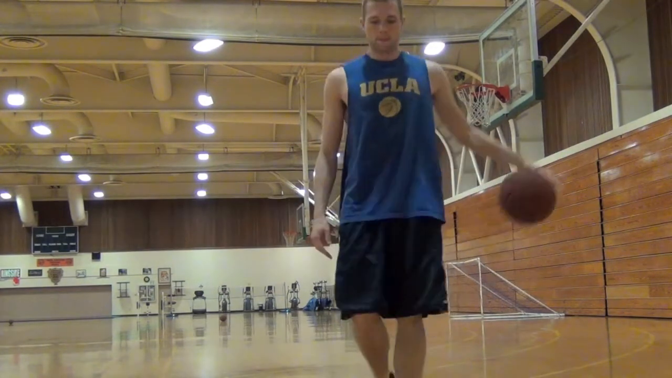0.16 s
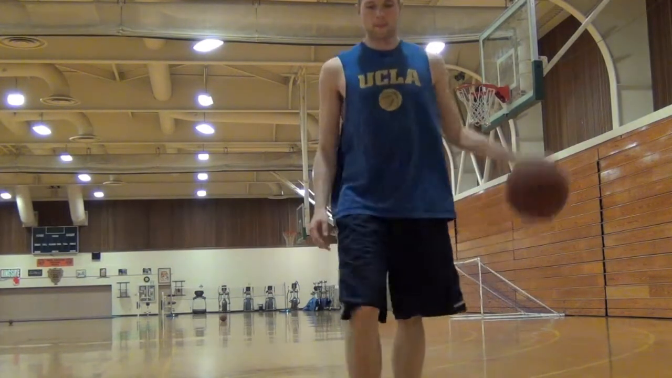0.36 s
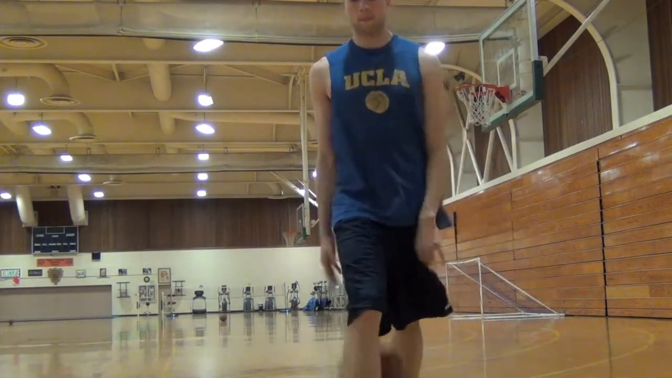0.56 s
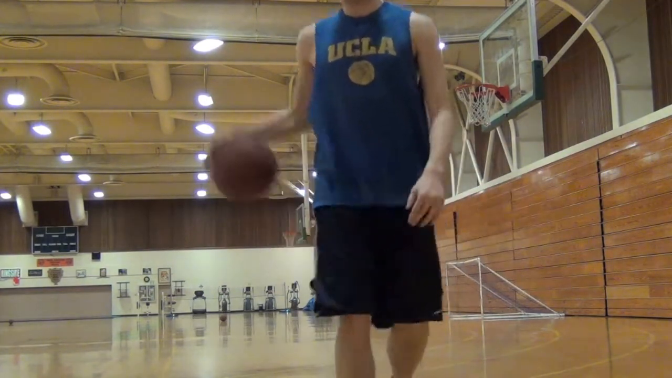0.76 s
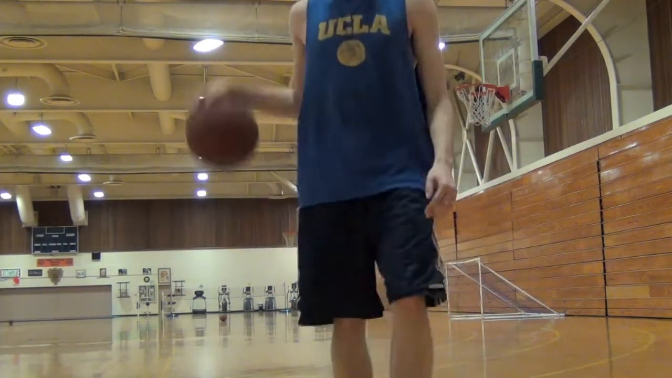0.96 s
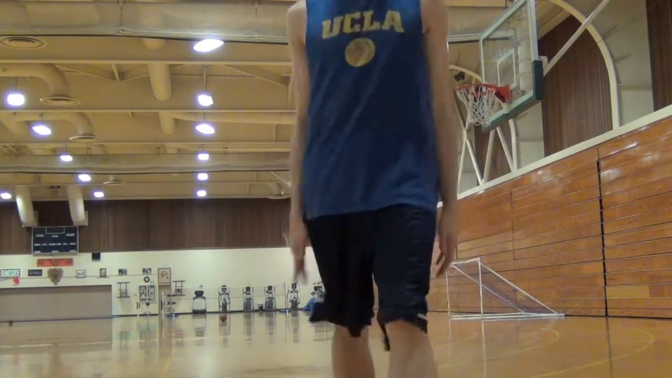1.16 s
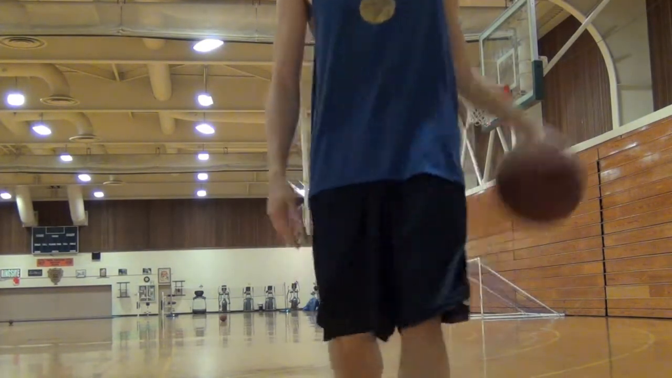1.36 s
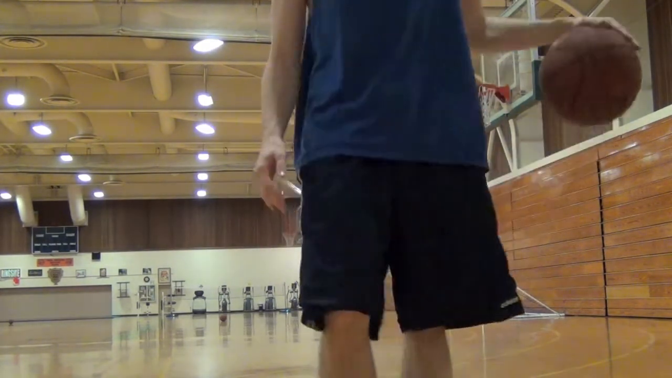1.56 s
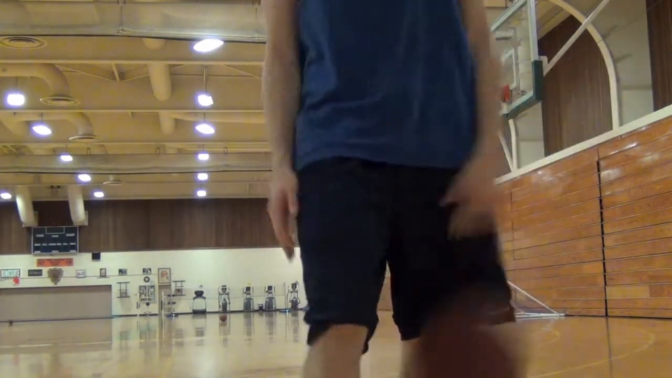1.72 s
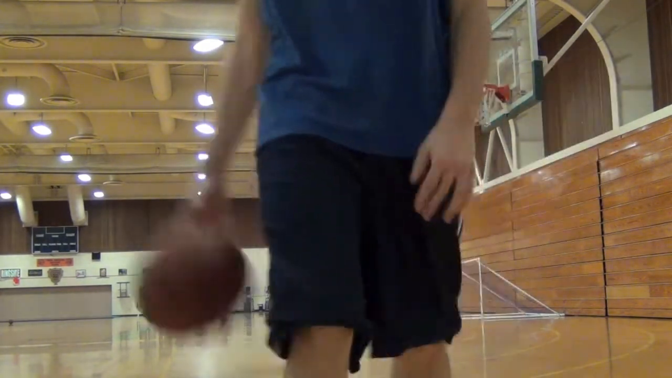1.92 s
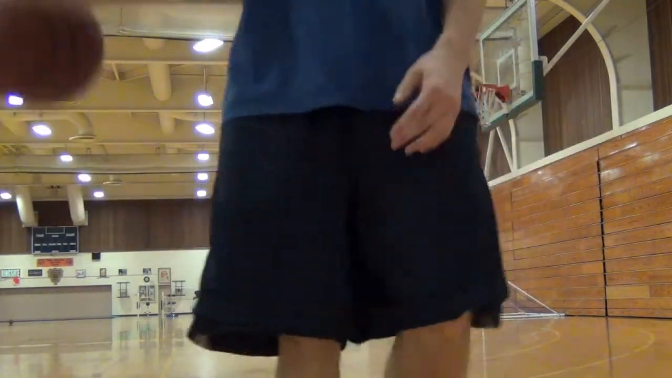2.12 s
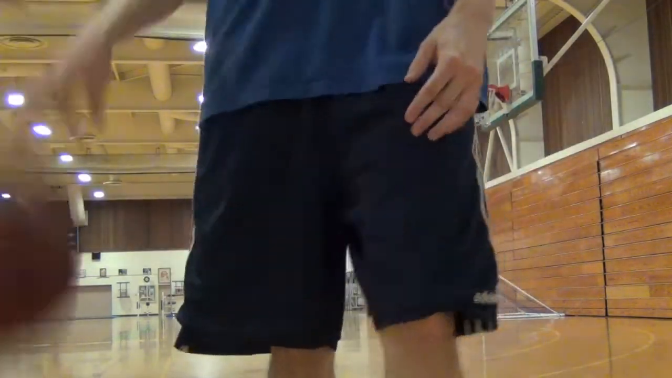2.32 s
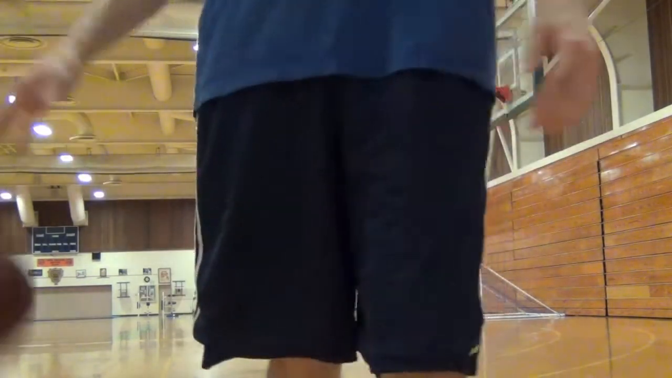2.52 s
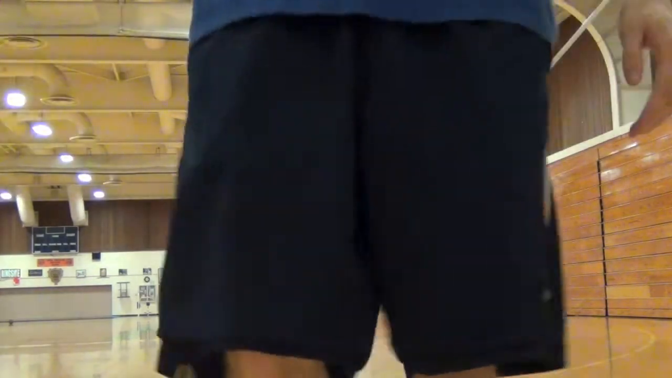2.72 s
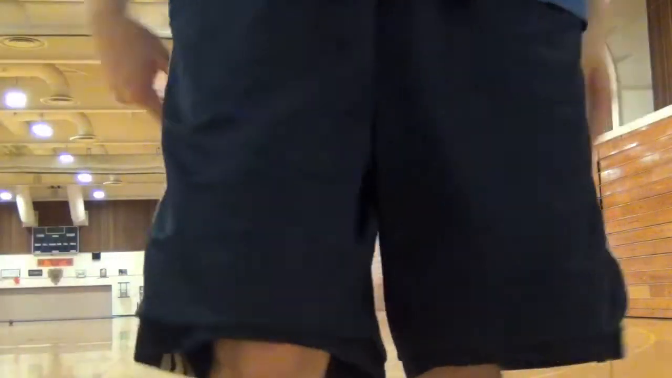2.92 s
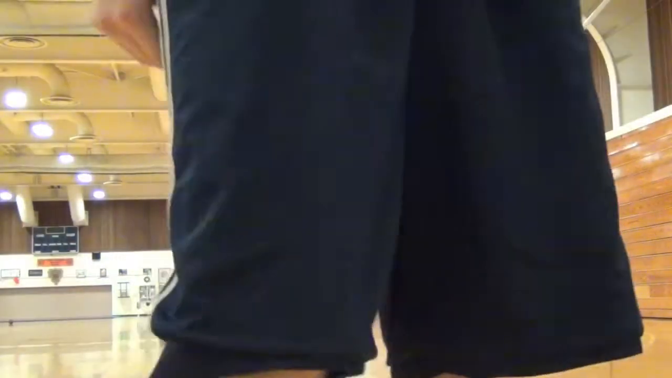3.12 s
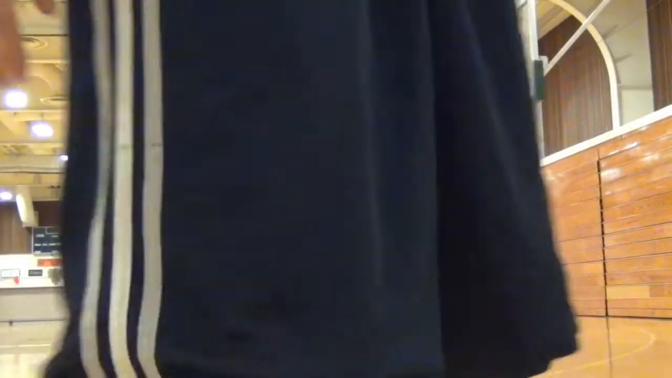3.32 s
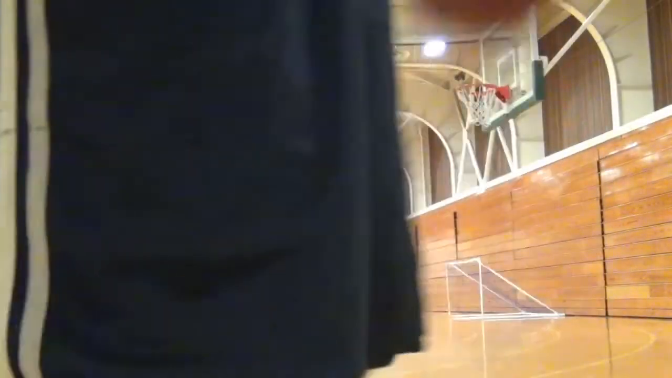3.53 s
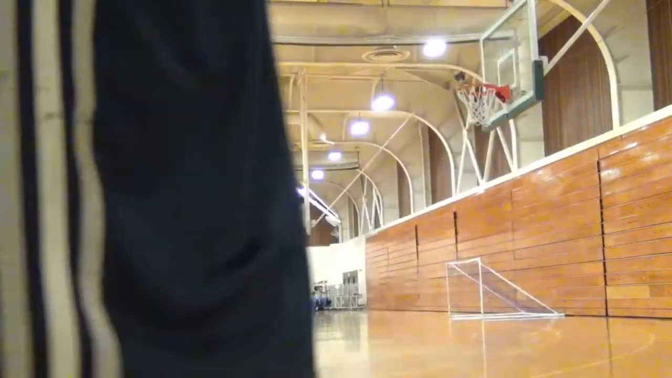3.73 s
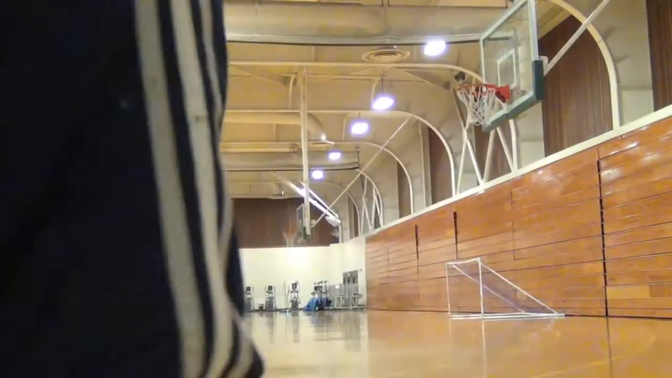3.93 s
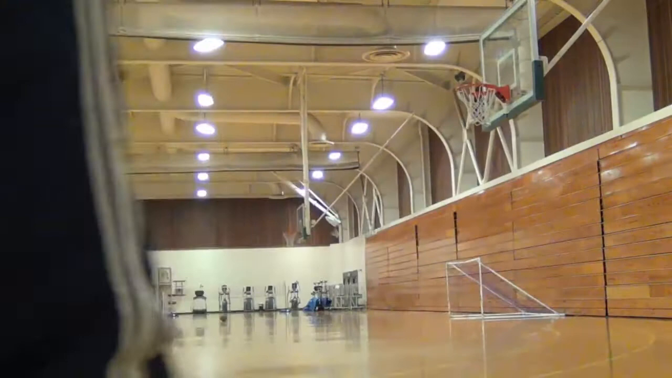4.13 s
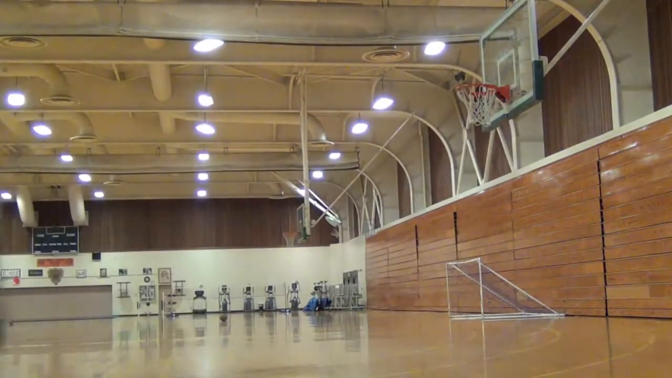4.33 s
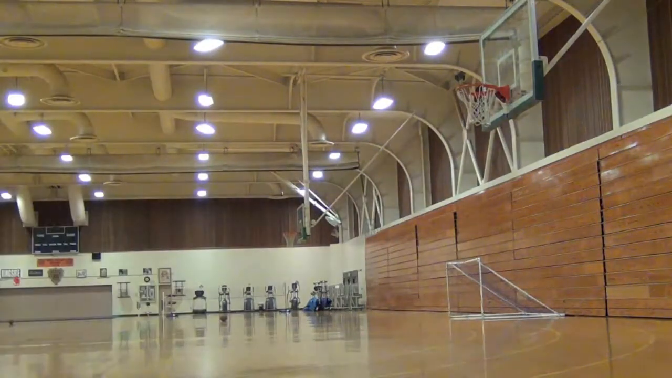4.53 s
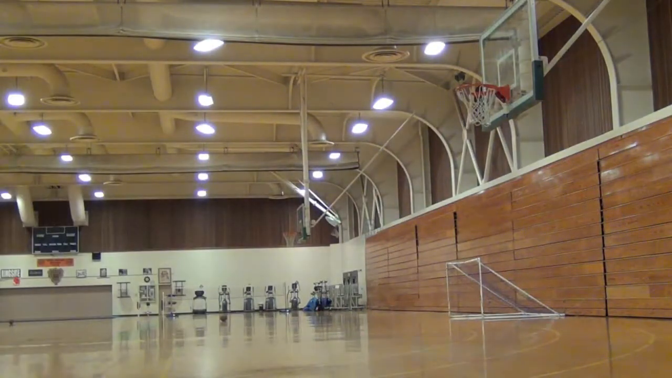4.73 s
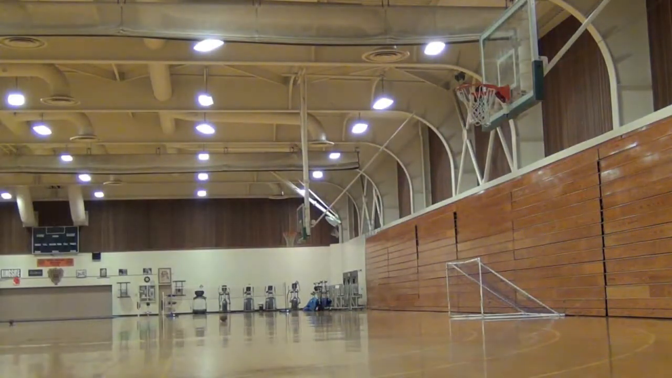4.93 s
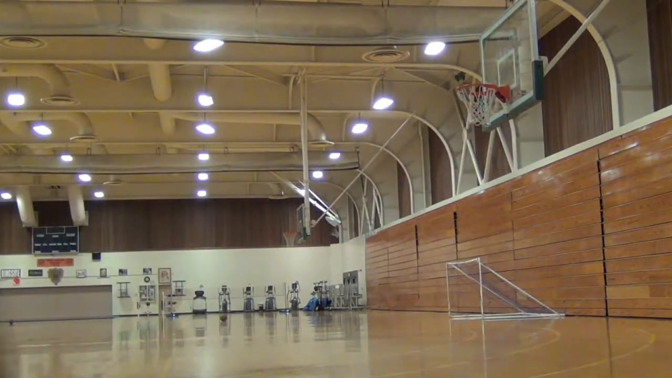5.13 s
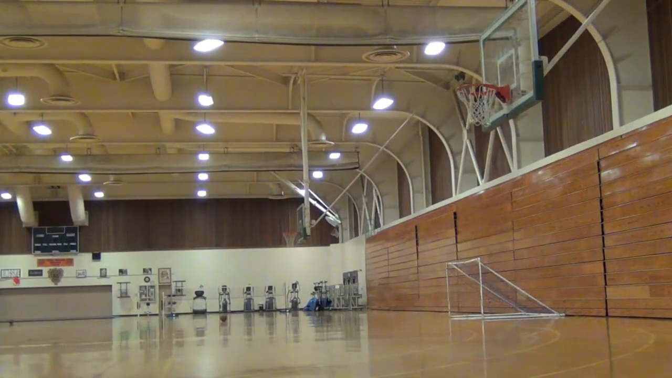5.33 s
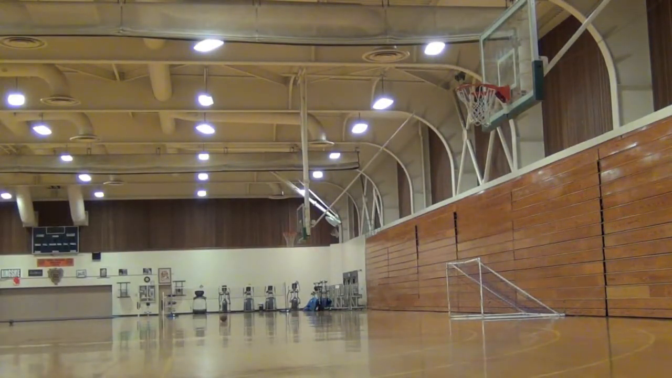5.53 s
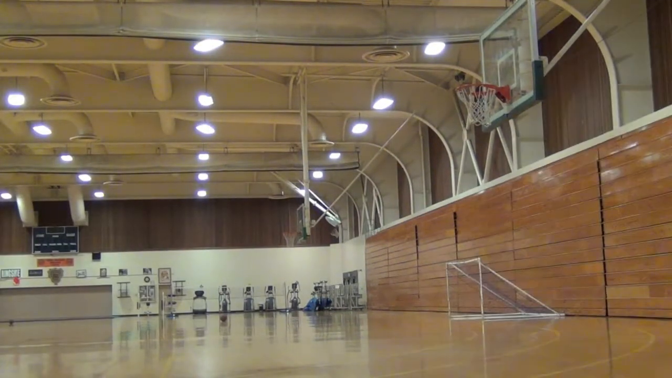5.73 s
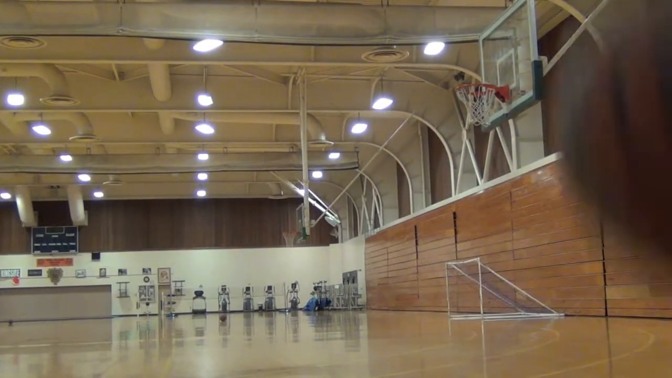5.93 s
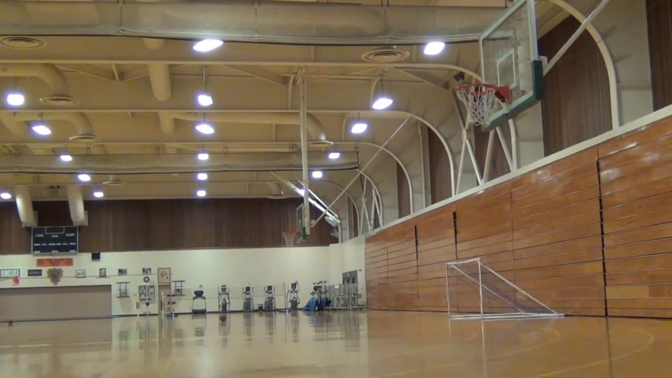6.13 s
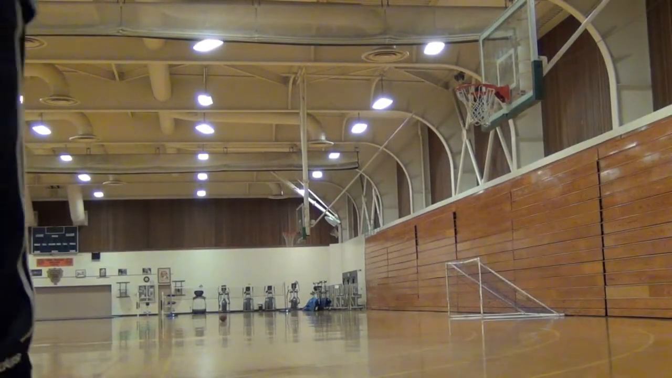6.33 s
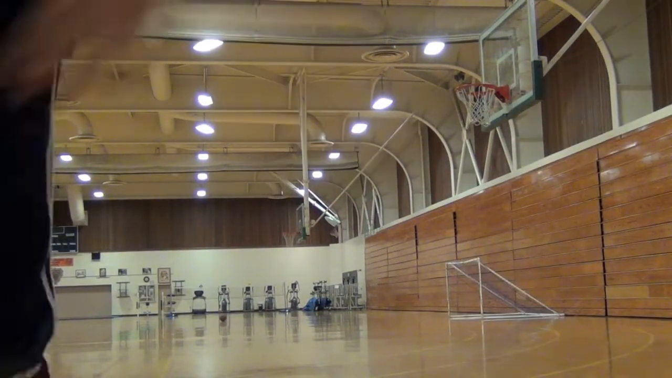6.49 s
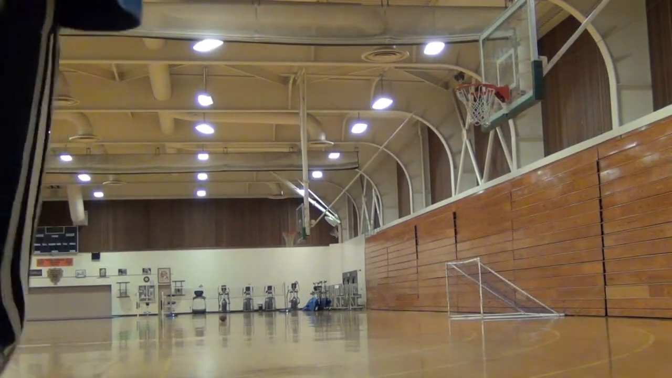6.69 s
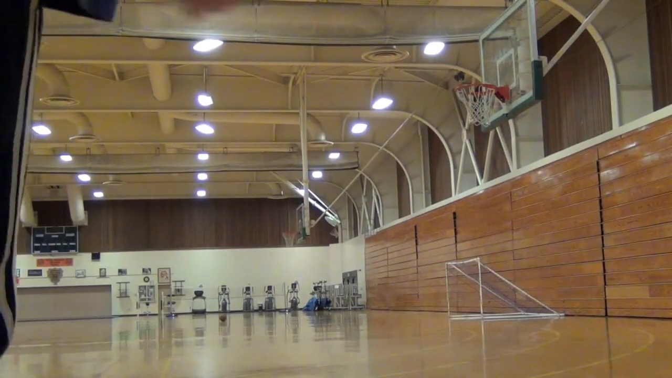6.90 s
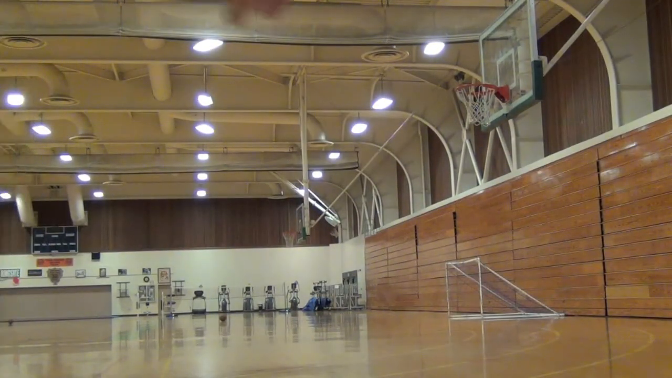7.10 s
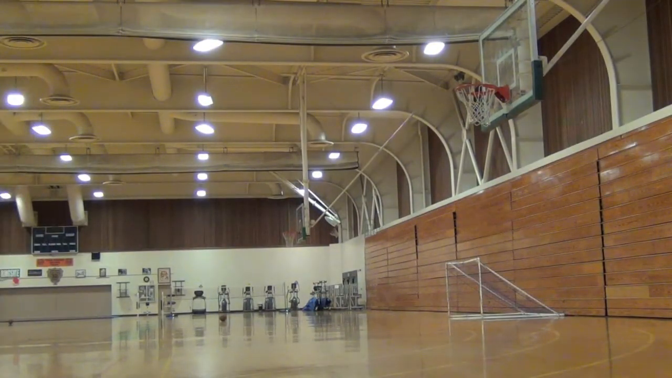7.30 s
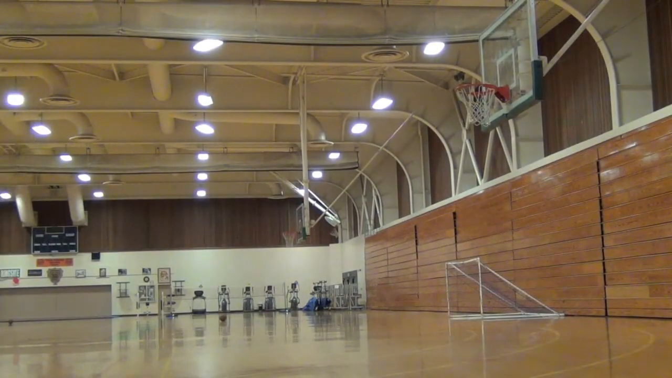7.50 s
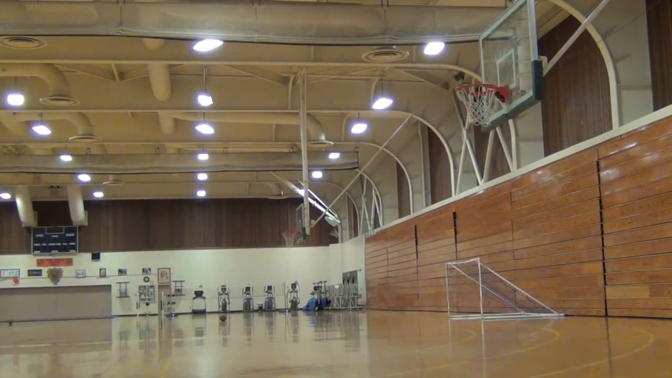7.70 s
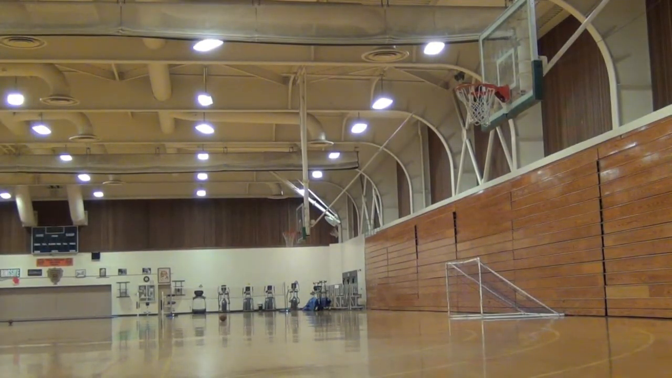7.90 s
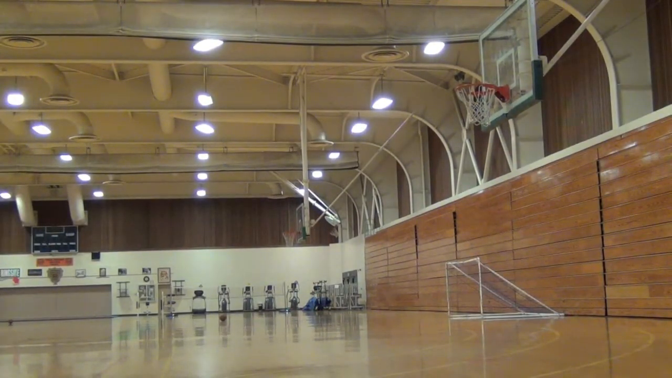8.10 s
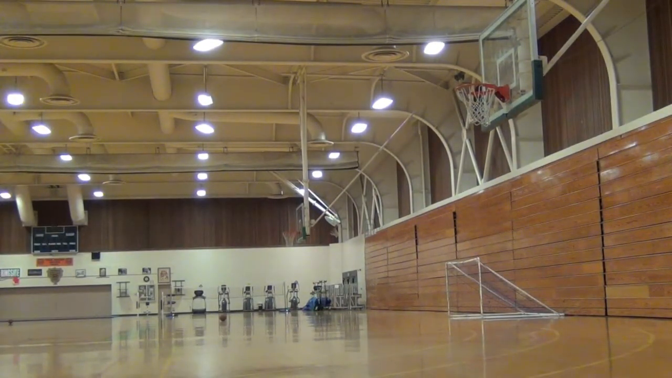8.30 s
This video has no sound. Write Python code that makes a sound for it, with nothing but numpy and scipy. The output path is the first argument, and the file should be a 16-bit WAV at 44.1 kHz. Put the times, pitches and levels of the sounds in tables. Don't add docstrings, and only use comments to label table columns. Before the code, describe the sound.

Steady, widely spaced basketball bounces crack and boom on hardwood in a large empty hall, with finger ticks and footsteps between them.

```python
import sys
import numpy as np
from scipy import signal
from scipy.fft import rfft, irfft
from scipy.io import wavfile
from scipy.ndimage import uniform_filter1d

SR = 44100
rng = np.random.default_rng(int(sys.argv[2]) if len(sys.argv) > 2 else 0)


def level_to_linear(level):
    exponent = np.asarray(level, float) / 20
    return 10 ** exponent


def store_wav(level_fs):
    pcm = np.round(np.clip(np.atleast_2d(level_fs), -1, 1) * 32767)
    wavfile.write(sys.argv[1], SR, pcm.T.astype(np.int16))


N = 368230
CONTACT_S = 11.3 / 1000
RISE_S = .00055

# f/Hz, side minus mid level/dB
SIDE_COLOUR = [(60, -36), (110, -62), (200, -34), (380, -19.5), (700, -12), (1290, -11), (2380, -10.5),
               (4400, -10.5), (8120, -11), (15000, -29)]


def on_log_hz(hz, table, col=1):
    table = np.array(table, float)
    return np.interp(np.log(hz + 1), np.log(table[:, 0]), table[:, col])


def colour(x, table):
    hz = np.fft.rfftfreq(x.shape[-1], 1 / SR)
    return irfft(rfft(x) * level_to_linear(on_log_hz(hz, table)), x.shape[-1])


def band(x, hz, octaves):
    edges = np.clip(hz * 2. ** np.array([-octaves / 2, octaves / 2]), 20, .45 * SR)
    return signal.sosfilt(signal.butter(2, edges, "bandpass", fs=SR, output="sos"), x)


def unit(x):
    return x / np.abs(x).max()


def add(out, s, x):
    i = int(round(s * SR))
    start = max(i, 0)
    end = max(start, min(i + x.shape[-1], N))
    out[:, start:end] += x[..., start - i:end - i]


def ring(hz, t60, size=8192):
    t = np.arange(size) / SR
    return np.sin(2 * np.pi * hz * t) * 1000. ** (-t / t60)


def burst(ms, size=2048):
    return rng.standard_normal(size) * np.exp(-np.arange(size) / SR / (max(ms, .1) / 1000))


def bounces():
    # slap t/s, hall level/dB, lift-off level/dB, long air ring level/dB
    hits = [(-0.39, -18.5, -20, -50), (0.5995, -23.5, -27, -50), (1.2379, -24, -26, -44),
            (1.8752, -24.5, -17, -53), (2.4964, -22, -9.5, -26), (3.0165, -22, -9, -41),
            (3.7569, -22.5, -14, -33), (4.4562, -19, -7.5, -43), (5.1222, -19, -11.5, -28),
            (5.8562, -22.5, -11.5, -39), (6.6356, -21, -8, -42), (7.3043, -20, -1, -31)]
    # boards f/Hz, brightness/dB, left gain/dB with right its opposite (below zero: the body
    spots = [(160, 18, 1, 0.26, 10.5), (173, 5.5, 0, 0.35, -1), (214, 6, 0.9, -0.06, -1),
             (194, 4, 0.4, 0.04, -2), (215, 4, 2, 0.67, 3), (202, 1.5, .9, 0.12, 1.5),
             (150, 7.5, 1.2, 0.32, 2.5), (150, 2, 2, 0.12, 0.5), (186, -7, 2, -0, -4),
             (161, -1, -2, 0, 2.5), (150, 4, 2.7, 0.42, 1), (132.5, 6.5, 4.2, 0.09, 2.5)]
    # t/s, distance of the ball/m
    walk = [(.6, 4.85), (1.24, 3.6), (1.875, 2.93), (2.5, 1.48), (3.76, 2.27), (4.46, 1.55), (5.12, 1.27),
            (5.86, 1.3), (6.64, 1)]
    out = np.zeros((2, N))
    for (hit_s, hall_db, lift_db, ring_db), spot in zip(hits, spots):
        boards_hz, bright_db, pan_db, octaves, air_db = spot
        metres = np.interp(hit_s, *np.transpose(walk))
        screened = pan_db < 0
        pan = level_to_linear(np.array([[pan_db], [-pan_db]]))
        snap_db = -9 - 2 * metres
        air = ball_air(ring_db, screened)
        add(out, hit_s - RISE_S, pan * air)
        strike(out, hit_s, boards_hz, bright_db, pan, snap_db, metres, screened)
        lift_off(out, hit_s + CONTACT_S, boards_hz, lift_db, pan, snap_db)
        echoes(out, hit_s - RISE_S, hall_db, metres, screened)
        tail = hall_response(metres, 1400 * 2 ** octaves, air_db, .5 - .5 * screened)
        source = .045 * air[:8192]
        source[0] = 1
        add(out, hit_s - RISE_S, level_to_linear(hall_db) * signal.fftconvolve(tail, source[None], axes=1))
    return out


def slap(hz, smear_ms, octaves):
    cycles = (np.arange(2048) - 24) / SR * hz
    width = np.where(cycles < 0, .43, .38)
    crack = -np.cos(2 * np.pi * cycles) * np.exp(-(cycles / width) ** 2)
    rattle = unit(band(burst(smear_ms), .8 * hz, octaves))
    return unit(crack / max(smear_ms, .4) + .55 * rattle)


def ball_air(ring_db, screened):
    # f/Hz, t60/s
    modes = [
        (965, .15),
        (1250, .07),
        (2147, 1.0),
        (2832, 1.1),
    ]
    levels = (-24.5, -29.5, ring_db + (10 if screened else -6), ring_db)
    gather = np.arange(32768) / SR / .07
    air = np.zeros(32768)
    for (hz, t60), db in zip(modes, levels):
        air += level_to_linear(db) * ring(hz, t60, size=32768) * np.minimum(gather / t60, 1)
    return air


def strike(out, hit_s, boards_hz, bright_db, pan, snap_db, metres, screened):
    s = hit_s - RISE_S
    peak_db = -2.8 - 3.6 * screened
    crack_hz = 2070 * 2 ** (.03 * bright_db) * (.64 if screened else 1)
    add(out, s, pan * level_to_linear(peak_db + 1.5) * slap(crack_hz, .5, 3.5))
    skin = ring(1084, .033) + .35 * ring(595, .028) + .56 * ring(398.7, .14)
    add(out, hit_s, pan * level_to_linear(peak_db - 13) * skin)
    sizzle = unit(band(burst(1.3), 9000, 1.3))
    add(out, s + RISE_S / 2, level_to_linear(-25.5 + 2 * bright_db) * sizzle)
    pressed = np.interp(np.arange(8192) / SR, [.007, .011], [1, .15])
    add(out, s + .001, level_to_linear(-7.8 - .6 * metres) * ring(boards_hz, .1) * pressed)
    grind = burst(28) * np.where(np.arange(2048) < int(CONTACT_S * SR), 1, .4)
    grind = unit(band(grind, 780, 1.76) + .12 * band(grind, 3570, 2.12))
    add(out, s, pan * level_to_linear(snap_db - 1) * grind)
    add(out, s - metres / 1000, level_to_linear(peak_db - 17) * ring(1900, .014, size=512))


def lift_off(out, lift_s, boards_hz, lift_db, pan, snap_db):
    add(out, lift_s - .45 / boards_hz, level_to_linear(lift_db) * ring(boards_hz, .04))
    overtones = .7 * ring(1.3 * boards_hz, .1) + .7 * ring(1.9 * boards_hz, .08)
    overtones += .55 * ring(2.8 * boards_hz, .07)
    add(out, lift_s, -level_to_linear(min(lift_db, -7) - 2) * overtones)
    add(out, lift_s - RISE_S, pan * level_to_linear(snap_db) * slap(1700, 1.5, 2.4))
    add(out, lift_s - .003, pan * level_to_linear(snap_db - 10.5) * ring(1250, .07))


def echoes(out, s, hall_db, metres, screened):
    # delay with the ball at the microphones/ms, advance [ms per m], smear/ms
    reflectors = [
        (33.4, 1, 1),
        (62.6, 2.6, 3),
        (69.5, .9, 4),
        (73.5, .9, 2),
        (95, .5, 3),
        (119, 1, 1.5),
    ]
    # level over the hall/dB, loss [dB per m], f/Hz
    returns = [
        (22, 4.5, 2240),
        (15.5, 4.5, 2400),
        (7, 1.5, 1900),
        (8, 8, 5400),
        (5.5, 2, 1500),
        (6, 2, 5600),
    ]
    for k, ((ms, sooner, smear_ms), (db, loss_db, hz)) in enumerate(zip(reflectors, returns)):
        echo_db = hall_db + db - loss_db * metres - 13 * screened / (1 + k)
        echo = slap(hz / (1 + .12 * metres), smear_ms, 1.9)
        add(out, s + (ms - sooner * metres) / 1000, level_to_linear(echo_db) * echo)


def hall_response(metres, favoured_hz, air_db, tilt_db):
    # f/Hz, level before the roof answers/dB, swell of the far walls/dB
    build = [(60, -3, 3), (200, -5, 4), (600, -1, 2), (1400, -4, 4), (3000, -3, 3.5), (6500, -4, 2.5),
             (12000, -4, 3)]
    # f/Hz, t60/s
    decay = [(40, 3.4), (120, 2.44), (350, 2.78), (700, 2.48), (1400, 2.93), (3000, 2.95), (6000, 1.52),
             (12000, 1.25)]
    # f/Hz, level/dB
    tone = [(25, -27), (70, 2.5), (110, 4), (250, -3), (310, -7), (460, -6.5), (540, -15), (880, -15.5),
            (1000, -10.5), (1400, -14), (2800, -18.5), (4500, -23), (11900, -41), (16000, -56)]
    hz, t = np.fft.rfftfreq(512, 1 / SR)[:, None], np.arange(900) * 128 / SR
    roof_ms = 62.6 - 2.6 * metres
    since_roof = t - (roof_ms - 14) / 1000
    fill = np.clip(since_roof / .022, 0, 1)
    swell = fill * np.exp(-((since_roof - .04) / .06) ** 2)
    db = on_log_hz(hz, build) * (1 - fill) + on_log_hz(hz, build, col=2) * swell
    db = db - 60 * t / on_log_hz(hz, decay)
    db = db + tilt_db * np.log2((hz + 40) / 1000)
    db = db + air_db / (1 + (6000 / (hz + 1)) ** 4)
    db = db + 4.5 * np.exp(-(np.log2((hz + 1) / favoured_hz) / .33) ** 2)
    clusters = uniform_filter1d(rng.standard_normal((257, 900)), size=24, axis=0)
    clusters = uniform_filter1d(clusters, size=3, axis=1)
    db = db + 2.2 * clusters / clusters.std() * np.exp(-t / .5)
    cells = rng.standard_normal((2, 257, 900)) + 1j * rng.standard_normal((2, 257, 900))
    mid, side = signal.istft(cells * level_to_linear(db), nperseg=512, noverlap=384)[1]
    mid, side = colour(mid, tone), colour(colour(side, tone), SIDE_COLOUR)
    size = len(mid)
    fade = np.interp(np.arange(size), [0, .01 * SR, size - SR / 2, size], [0, 1, 1, 0])
    return fade * np.array([mid + side, mid - side]) / mid[:SR // 4].std()


def finger_ticks():
    # t/s, peak level/dB, body level/dB, length/ms
    ticks = [(1.1417, -39, 20, 8.9), (1.1847, -33, -2, 7.8), (1.769, -36, 2, 6), (1.8387, -44, 20, 10.5),
             (2.3875, -40, 7, 5), (2.9194, -46, 22, 4.8), (3.2194, -33, -14, 6.6), (3.2794, -34, 12, 4.9),
             (3.3498, -36, 18, 6.6), (3.5494, -43, 13, 5.2), (3.6194, -50, 10, 5.4),
             (4.0617, -30, -10, 3.3), (4.0877, -44, 19, 6.7), (4.153, -37, 4, 6), (4.1959, -34, 5, 4.9),
             (4.238, -34, 2, 4.8), (4.298, -31, -6, 7.3), (4.3266, -41, -2, 5.9), (5.03, -38, 14, 2.1),
             (5.3394, -59, 8, 4.7), (5.4122, -33, 19, 5.5), (5.4879, -38, 18, 6), (6.2395, -41, 22, 4.1),
             (6.613, -36, 4, 6), (7.034, -47, 30, 2.8), (7.2847, -36, -10, 3.1), (7.4813, -21, 9, 6)]
    out = np.zeros((2, N))
    for s, db, body_db, ms in ticks:
        grit = burst(ms / 3)
        edge, body = unit(band(grit, 6200, 2.0)), unit(band(grit, 4600, .94))
        add(out, s, level_to_linear(db) * (edge + level_to_linear(body_db - 11) * body))
    return out


def heel_thumps():
    # t/s, peak level/dB, f/Hz
    steps = [(0.306, -18, 150), (1.029, -17, 142), (2.883, -14.5, 224), (5.469, -27, 140),
             (6.242, -12, 146), (6.426, -35, 107), (7.222, -20, 129), (7.471, -10, 101), (7.689, -15, 230),
             (7.808, -9, 198), (8.083, -18, 220)]
    out = np.zeros((2, N))
    soft_start = np.minimum(np.arange(8192) / SR / .0042, 1)
    for s, db, hz in steps:
        add(out, s, level_to_linear(db - 6) * ring(hz, .082) * soft_start)
    return out


def scuffs():
    # start t/s, end t/s, level/dB, f/Hz
    rubs = [(0.486, 0.594, -51.5, 9300), (0.81, 0.907, -52, 9860), (1.147, 1.15, -38.5, 8450),
            (1.188, 1.202, -46, 9000), (1.792, 1.868, -54.5, 9650), (3.41, 3.486, -56, 9000),
            (4.061, 4.073, -36, 6550), (6.468, 6.538, -57, 7230), (7.05, 7.25, -61, 12500),
            (7.786, 7.86, -68, 12000)]
    out = np.zeros((2, N))
    for start, end, db, hz in rubs:
        size = int((end - start) * SR)
        grit = rng.standard_normal(size) * signal.windows.tukey(size, .3)
        add(out, start, level_to_linear(db + 5) * band(grit, hz, 1.1))
    return out


def squeak():
    # t/s, f/Hz, level/dB
    glide = [(5.46, 11400, -75), (5.51, 12600, -76), (5.53, 13100, -67), (5.58, 13100, -69),
             (5.65, 13200, -64), (5.69, 12800, -72), (5.73, 12900, -63), (5.765, 11460, -71),
             (5.79, 11300, -77)]
    out = np.zeros((2, N))
    s, hz, db = np.transpose(glide)
    t = np.arange(s[0], s[-1], 1 / SR)
    for ratio, strand_db in [(1, 2), (1.065, -3), (.955, -5)]:
        waver, throb = uniform_filter1d(rng.standard_normal((2, SR // 2)), size=150)[:, :len(t)]
        pitch = ratio * np.interp(t, s, hz) * (1 + .1 * waver)
        phase = 2 * np.pi * np.cumsum(pitch) / SR
        add(out, s[0], level_to_linear(np.interp(t, s, db) + strand_db + 59 * throb) * np.sin(phase))
    return out


def vents():
    # f/Hz, level/dB
    tone = [(30, -23), (100, 9), (250, -18), (650, -5), (1300, -6), (4000, -15), (8000, -29.5),
            (12000, -33.5), (16000, -34)]
    mid, side = colour(rng.standard_normal((2, N)), tone)
    side = colour(side, SIDE_COLOUR)
    return level_to_linear(-45) * np.array([mid + side, mid - side]) / mid.std()


def scene():
    return bounces() + finger_ticks() + heel_thumps() + scuffs() + squeak() + vents()


def band_limit(x):
    return signal.sosfilt(signal.butter(12, 16820, fs=SR, output="sos"), x)


def record(dry):
    x = signal.sosfilt(signal.butter(2, 45, "highpass", fs=SR, output="sos"), dry)
    x = np.tanh(1.1 * x) / 1.1
    x = signal.sosfilt(signal.butter(8, 15400, fs=SR, output="sos"), x)
    return band_limit(x)


dry = scene()
out = record(dry)
store_wav(out)
```